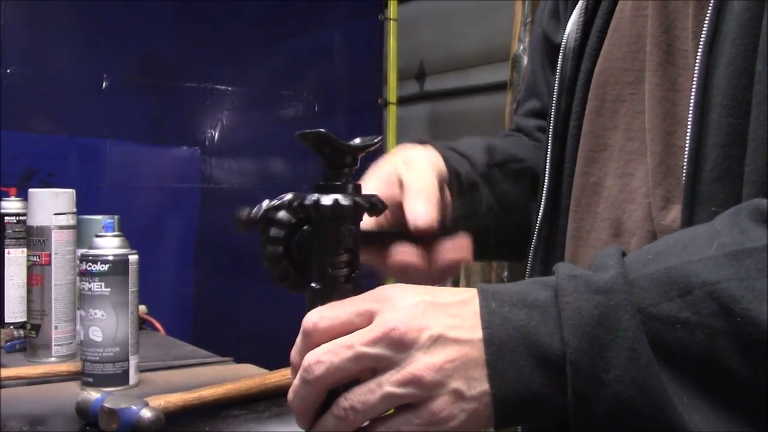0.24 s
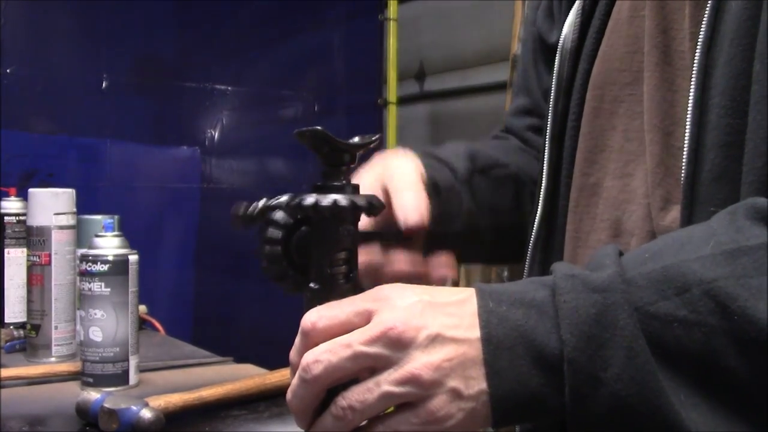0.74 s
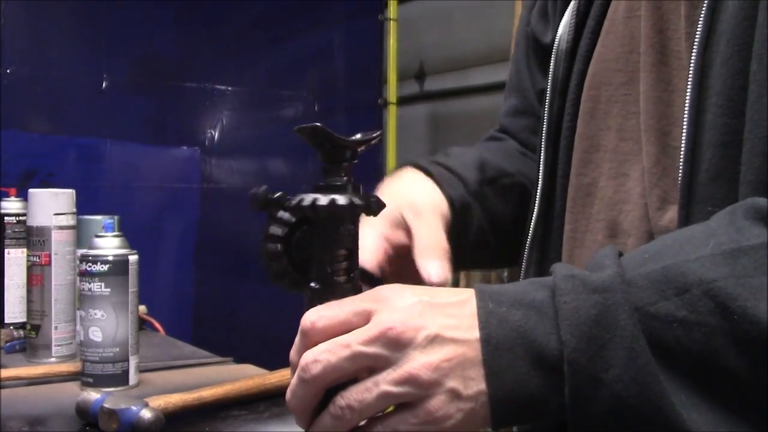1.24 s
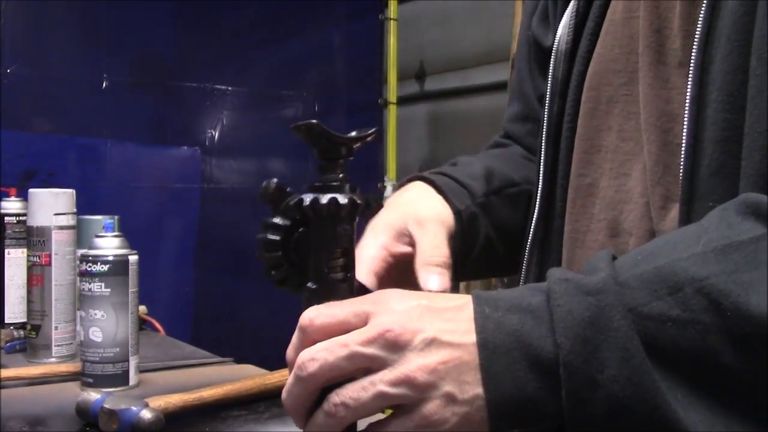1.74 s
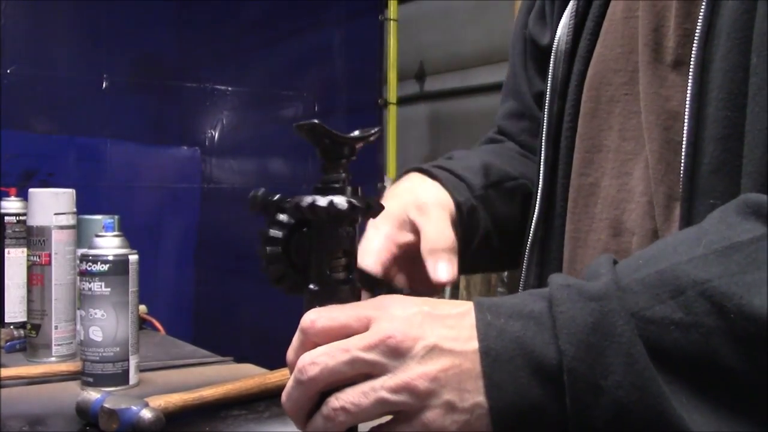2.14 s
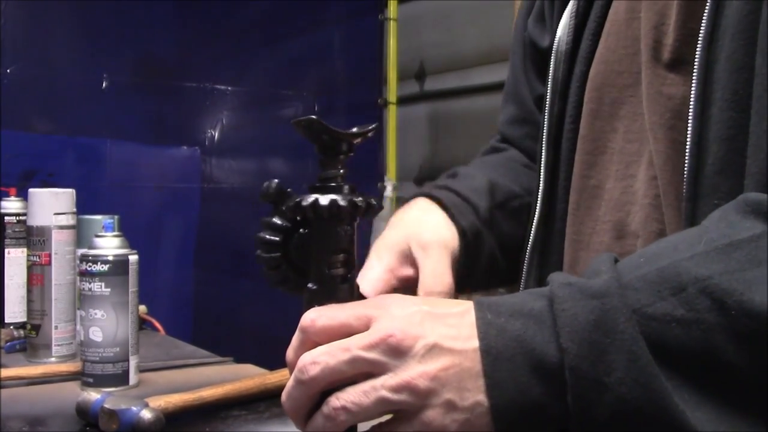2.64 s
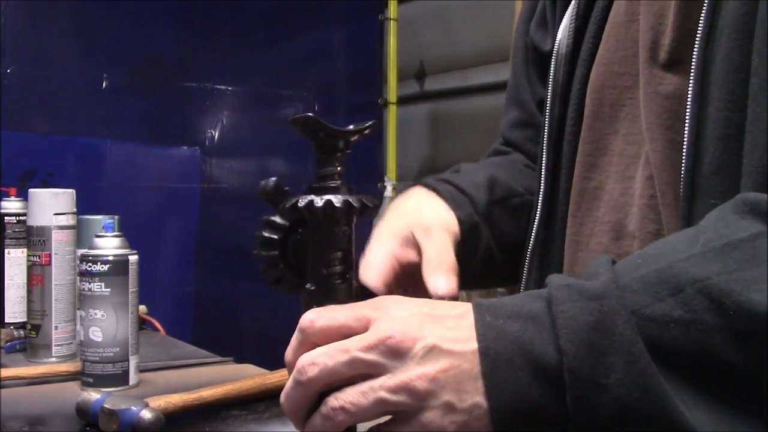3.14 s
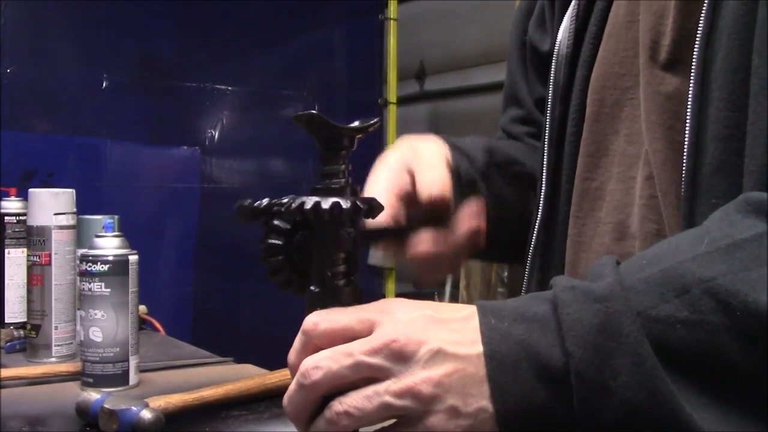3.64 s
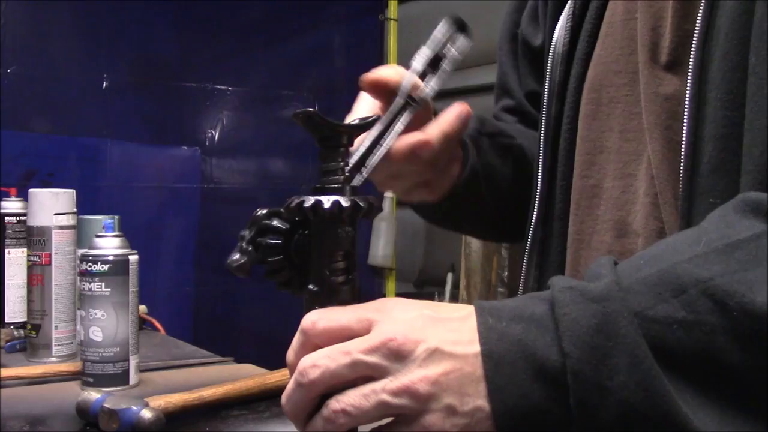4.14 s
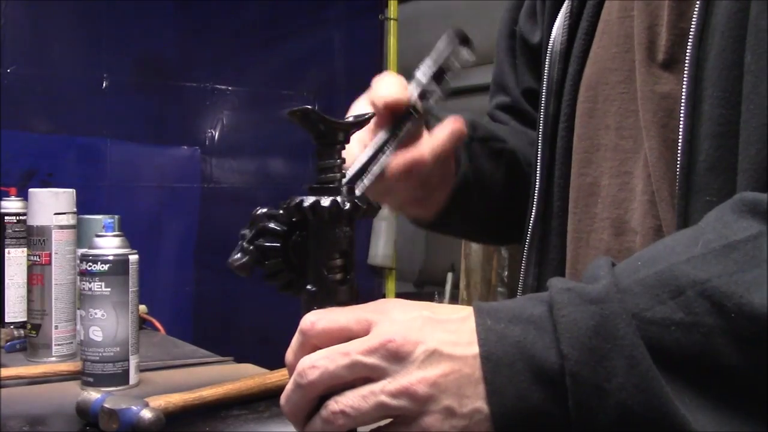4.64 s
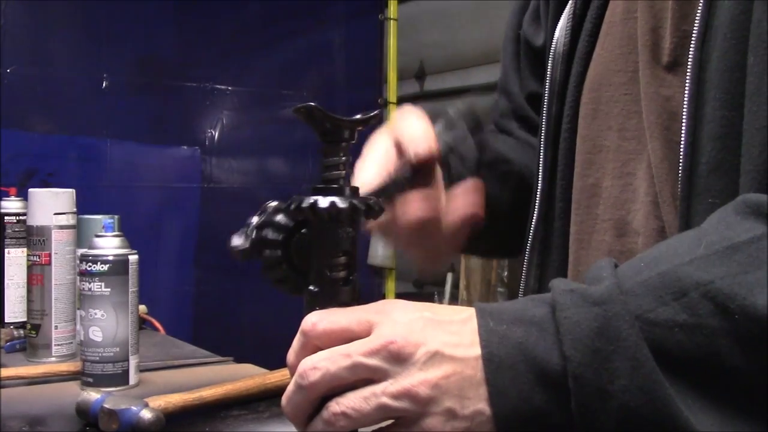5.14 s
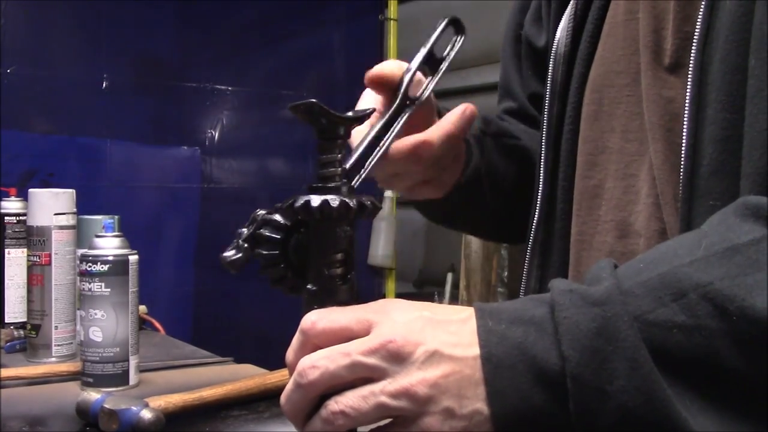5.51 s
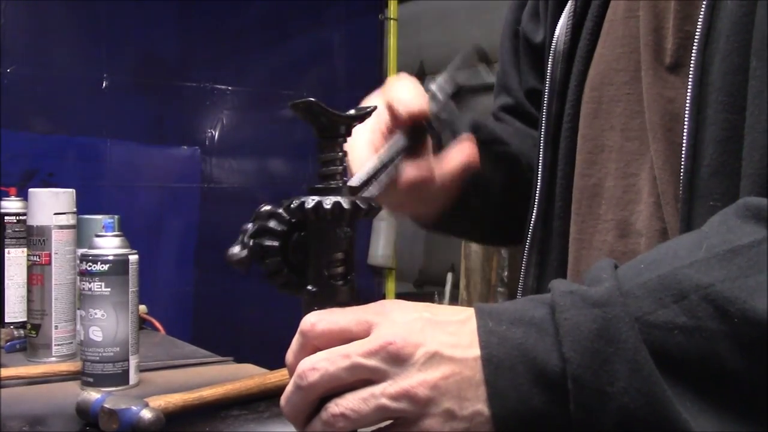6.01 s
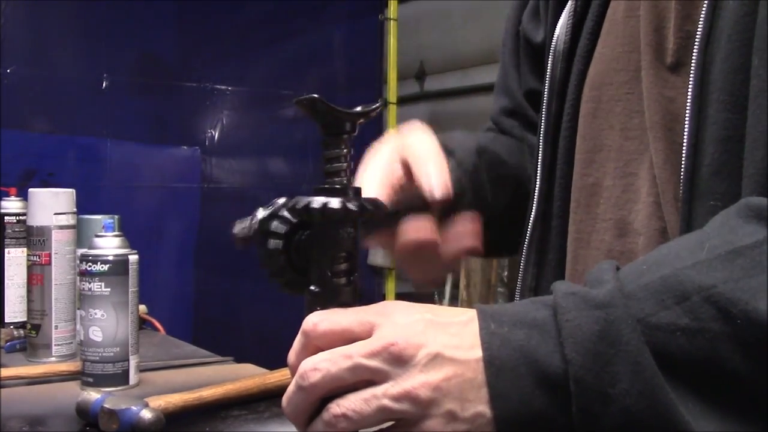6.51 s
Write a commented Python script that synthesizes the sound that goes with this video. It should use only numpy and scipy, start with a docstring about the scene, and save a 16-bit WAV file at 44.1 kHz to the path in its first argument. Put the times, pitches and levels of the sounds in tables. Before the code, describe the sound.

A small steel ratchet jack is cranked by hand, with uneven bright ringing clicks, dull knocks and faint gear grinding.

```python
"""Bright, ringing clicks in an uneven run: a hand swings the handle of a small steel ratchet jack on a
workbench, close to a nearly mono microphone. The pawl snaps over the gear teeth and rings at two high
pitches until the next tooth stops it. Loose gears and the handle knock dully and grind between the
snaps. Behind the jack, the workshop adds a short tail over a low hum."""
import sys
import numpy as np
from scipy import signal
from scipy.fft import rfft, irfft, next_fast_len
from scipy.io import wavfile
from scipy.ndimage import uniform_filter1d

SR = 44100
rng = np.random.default_rng(int(sys.argv[2]) if len(sys.argv) > 2 else 0)


def to_wav(s):
    """Save 16-bit WAV."""
    ch = np.atleast_2d(s).T  # columns
    pcm = np.round(np.clip(ch, -1, 1) * 32767)  # PCM
    wavfile.write(sys.argv[1], SR, pcm.astype(np.int16))


N = 298557
T = np.arange(N) / SR

# the pawl snaps into a tooth or catches on it:
# t/s, crack level/dB, frame level/dB, ring level/dB, ring f/Hz, ring t60/s, overtone level/dB
PAWL_SNAPS = [(0.0406, -10, -12, -6, 5700.0, 0.13, -18), (0.0878, -9.5, -11.5, -7.5, 5680.0, 0.12, -29),
              (0.155, -21.0, -19, -14.5, 5650.0, 0.088, -39),
              (0.5891, -7.0, -8.5, -0.5, 5660.0, 0.063, -20), (0.6365, -8.5, -16, -3, 5680.0, 0.062, -18),
              (0.647, -16, -21, -16, 5680.0, 0.045, -18), (0.9785, -12.5, -14.5, -12.5, 5680.0, 0.11, -29),
              (1.057, -12, -5, -10, 5650.0, 0.063, -31), (1.1029, -5, -7.5, -20, 5700.0, 0.041, -29),
              (1.1551, -12, -12, -12, 5700.0, 0.038, -23.5), (1.4296, -19, -18, -15, 5710.0, 0.024, -46),
              (1.501, -4.5, -10, -8.5, 5690.0, 0.083, -19), (1.5503, -21, -19, -26.5, 5670.0, 0.23, -38),
              (1.5779, -6, -16, -7, 5660.0, 0.022, -22), (1.6017, -20, -21, -34.5, 5680.0, 0.1, -36.0),
              (1.6619, -21, -18, -19, 5680.0, 0.026, -57), (1.868, -23.0, -17.5, -18.5, 5670.0, 0.055, -59),
              (1.942, -31.5, -42, -24.5, 5720.0, 0.09, -49.0), (1.9622, -6.5, -5.5, -8, 5680.0, 0.042, -38),
              (2.0266, -16, -17.5, -11.5, 5680.0, 0.045, -28), (2.0485, -15, -18, -30, 5680.0, 0.14, -48),
              (2.1263, -19, -16.0, -18, 5680.0, 0.031, -45), (2.3, -55, -29, -30.0, 5660.0, 0.079, -66.0),
              (2.3893, -31, -14.5, -9.5, 5660.0, 0.07, -44),
              (2.4191, -9, -10.5, -19.5, 5690.0, 0.14, -27.5),
              (2.4738, -5.5, -15, -4.5, 5650.0, 0.085, -23),
              (2.8857, -9, -12.5, -5.5, 5640.0, 0.157, -19.5), (2.9311, -14, -17.5, -13, 5690.0, 0.15, -26),
              (2.9608, -14.0, -16.5, -26, 5680.0, 0.1, -34),
              (2.9748, -11, -14.5, -11.5, 5700.0, 0.074, -27),
              (3.2388, -46, -31, -22.0, 5700.0, 0.083, -66), (3.3318, -10, -8.5, -3.5, 5690.0, 0.11, -27.5),
              (3.3811, -8.5, -5.5, -14, 5660.0, 0.08, -20.5), (3.407, -16, -18, -27, 5680.0, 0.1, -38),
              (3.5035, -8, -8, -9.5, 5680.0, 0.024, -43.5), (3.7088, -33, -13, -6.5, 5710.0, 0.037, -43),
              (3.7376, -7, -9.5, -4.5, 5700.0, 0.078, -19), (3.7902, -15.5, -13, -15.0, 5680.0, 0.067, -33),
              (3.8384, -7.5, -11.5, -7.5, 5660.0, 0.064, -24),
              (4.091, -23.5, -17, -22.5, 5660.0, 0.084, -48), (4.1826, -4, -5, -11.5, 5690.0, 0.11, -15),
              (4.2423, -4, -9, -7.5, 5670.0, 0.064, -15), (4.26, -18, -13.5, -17.5, 5680.0, 0.058, -36.5),
              (4.3128, -23.5, -18.5, -23, 5680.0, 0.045, -47),
              (4.4983, -22, -20.5, -19.5, 5680.0, 0.035, -43.0), (4.6, -28, -18.0, -19.5, 5696, 0.11, -49),
              (4.6253, -4, -9, -4.5, 5680.0, 0.076, -20), (4.6782, -9.5, -9.5, -3.5, 5700.0, 0.061, -22),
              (5.0486, -15.5, -9.0, -5, 5700.0, 0.084, -31), (5.0888, -6, -7, -10.5, 5680.0, 0.18, -14.5),
              (5.1387, -13, -16, -18, 5670.0, 0.083, -33.0), (5.145, -14.5, -13.5, -15, 5680.0, 0.057, -35),
              (5.231, -23, -13, -14, 5470.0, 0.11, -43), (5.5067, -4.5, -10.5, -9, 5690.0, 0.11, -22),
              (5.555, -7.5, -12, -4, 5650.0, 0.11, -19.5), (5.5849, -16.5, -20, -33, 5680.0, 0.1, -41.5),
              (5.694, -12, -12.5, -8, 5650.0, 0.025, -35), (5.9398, -19, -6, -8.0, 5650.0, 0.06, -35),
              (5.984, -4.5, -7, -6, 5650.0, 0.098, -26), (6.02, -13.0, -18, -42, 5680.0, 0.1, -42.0),
              (6.0362, -16, -6.5, -11, 5680.0, 0.06, -26.5),
              (6.2986, -33, -16.5, -22.5, 5710.0, 0.058, -56.5),
              (6.3897, -9, -9.5, -1.5, 5700.0, 0.056, -24), (6.4416, -17, -18, -19.5, 5680.0, 0.11, -30),
              (6.47, -5, -11.5, -8.5, 5700.0, 0.09, -21.5), (6.567, -17, -13.5, -11, 5720.0, 0.031, -31),
              (6.5913, -11, -11.5, -19, 5680.0, 0.041, -47.5),
              (6.7366, -46, -19, -17.5, 5690.0, 0.042, -60.0), (6.7493, -19.0, -15, -18, 5670.0, 0.16, -44)]
# the handle meets its stop or rattles in its socket: t/s, clack level/dB, frame level/dB, ring level/dB
HANDLE_STOPS = [(0.2565, -33, -22, -38), (0.275, -24, -23, -31.5), (0.7941, -6.5, -10.5, -20),
                (0.957, -30, -19, -36.5), (1.214, -40, -21, -25), (1.265, -7, -12.5, -31),
                (2.141, -22.5, -16, -29), (2.576, -41, -19, -22), (2.598, -23.0, -13, -30.0),
                (3.077, -9, -14.5, -31), (3.902, -31, -18.0, -25), (3.9395, -6, -12, -22),
                (4.38, -41, -19.5, -33), (4.516, -38, -12.5, -31), (4.7794, -24, -14.5, -32.5),
                (5.225, -38, -15, -32), (5.241, -5.5, -8.5, -26), (5.7292, -12.5, -12, -28),
                (6.122, -10.5, -13.5, -27)]
# a loose part lands: t/s, level/dB
PART_DROPS = [(0.328, -19), (0.3526, -33), (0.396, -41.5), (0.4074, -13.5), (0.4427, -25), (0.861, -13.5),
              (0.9267, -34.0), (1.2531, -43), (1.3355, -13.5), (1.6889, -32), (1.72, -28), (1.7815, -28),
              (1.794, -16), (2.222, -39.5), (2.2392, -12), (2.6898, -14.5), (3.1678, -15), (3.5914, -38.5),
              (3.602, -14.5), (4.0292, -14.5), (4.4328, -31), (4.4434, -13), (4.8841, -13.5),
              (5.3178, -35.5), (5.3346, -13), (5.377, -31.0), (5.7834, -12.5), (6.2164, -27),
              (6.2314, -12.5), (6.3697, -23), (6.6755, -11.5)]
# it bounces after each landing: delay/s, relative level/dB
PART_BOUNCES = [(.011, -6), (.021, -14)]
# dull knocks of gears and handle: t/s, level/dB, favoured f/Hz
GEAR_KNOCKS = [(0.041, -17.0, 790.0), (0.087, -16.5, 980.0), (0.154, -18.5, 1250.0), (0.256, -19, 760.0),
               (0.272, -17, 1540), (0.305, -19, 1640), (0.331, -27, 1000.0), (0.406, -18, 780.0),
               (0.505, -16.5, 990.0), (0.591, -18.5, 790.0), (0.638, -18.5, 1030.0), (0.646, -18, 780.0),
               (0.777, -14, 790.0), (0.793, -12, 1080), (0.859, -16.5, 790.0), (0.956, -12.5, 1240),
               (0.978, -16.5, 780), (1.057, -13.5, 790.0), (1.105, -10.0, 780), (1.154, -11.5, 1140),
               (1.215, -23, 800.0), (1.229, -20.5, 810.0), (1.254, -20, 1180.0), (1.267, -14.5, 1140),
               (1.336, -17, 760), (1.43, -18, 970), (1.5, -15.5, 790), (1.548, -21, 1230.0),
               (1.578, -18, 1830.0), (1.602, -21.0, 790.0), (1.661, -18.0, 940), (1.687, -17, 1130.0),
               (1.793, -19.5, 810.0), (1.823, -21.5, 775), (1.868, -15, 970), (1.907, -21.5, 1080),
               (1.962, -14.5, 1320), (2.026, -14.5, 1220), (2.049, -23, 810.0), (2.127, -17.5, 1250),
               (2.14, -12.5, 1270), (2.239, -17.5, 850), (2.302, -23, 1080.0), (2.388, -19.5, 1080),
               (2.419, -17.5, 1110), (2.475, -17.5, 1270), (2.576, -19, 1920), (2.59, -8, 1400),
               (2.672, -19, 1320), (2.691, -11, 1370), (2.785, -31, 1150), (2.815, -18, 1240),
               (2.886, -21.5, 820), (2.932, -21, 1080.0), (2.961, -24.5, 804), (2.976, -16, 1080),
               (3.039, -18, 1330), (3.069, -12.5, 1300.0), (3.077, -10, 1080.0), (3.097, -23, 1270),
               (3.158, -21.5, 1470.0), (3.168, -22, 800), (3.224, -21.5, 1140), (3.26, -16, 1066),
               (3.331, -14, 820), (3.381, -13.5, 820.0), (3.405, -21.0, 800.0), (3.492, -10, 1380),
               (3.503, -6.5, 1140), (3.525, -25, 1260), (3.6, -23, 810.0), (3.649, -14, 1210),
               (3.708, -16, 1248), (3.738, -17.5, 1404), (3.791, -17, 980.0), (3.836, -12.0, 1340.0),
               (3.913, -16, 950), (3.925, -23, 1000.0), (3.94, -11, 1930.0), (3.977, -16.5, 1220),
               (4.017, -22.0, 1070), (4.028, -20.5, 820.0), (4.054, -21, 1080.0), (4.089, -20, 1062),
               (4.111, -13.0, 1030), (4.182, -13.5, 1400), (4.243, -8.5, 1090), (4.26, -27, 820.0),
               (4.314, -18, 1107), (4.326, -20, 1270), (4.341, -16.5, 1360.0), (4.385, -18, 1160),
               (4.423, -18, 1394), (4.443, -18.5, 1540), (4.517, -10.5, 1260), (4.6, -22, 1330),
               (4.625, -13.5, 813), (4.678, -12, 1210), (4.749, -16, 1250), (4.756, -26, 830),
               (4.767, -26, 1350.0), (4.779, -14.5, 1290.0), (4.884, -19.5, 1530.0), (4.94, -18.5, 1080),
               (4.974, -13, 1280), (4.997, -20, 1120), (5.049, -19.5, 1610), (5.088, -16, 1246),
               (5.138, -18.5, 910), (5.144, -16.5, 1000), (5.23, -3.5, 1460), (5.241, -19, 1100),
               (5.334, -20, 820.0), (5.505, -7, 1920.0), (5.555, -20, 1810), (5.584, -22, 810.0),
               (5.698, -15, 1100), (5.725, -8, 1930), (5.784, -20, 820), (5.839, -20.5, 1210.0),
               (5.94, -10.0, 1370), (5.983, -14, 1870.0), (6.02, -24, 800.0), (6.035, -10, 960.0),
               (6.079, -16, 790.0), (6.103, -15.5, 780), (6.124, -16.5, 1270.0), (6.223, -18.5, 804),
               (6.232, -19.5, 1540.0), (6.242, -17.5, 754), (6.298, -20.5, 1080.0), (6.311, -23.5, 960),
               (6.387, -14.5, 1677), (6.44, -18.5, 1410.0), (6.468, -8.0, 1570.0), (6.567, -18, 883),
               (6.577, -17.5, 1306), (6.593, -11.5, 1250), (6.668, -10.5, 797), (6.705, -19, 786),
               (6.735, -26, 1070), (6.749, -17, 1120)]
# gears grinding under load: t/s, level/dB
GRIND_LEVELS = [(0.0, -52), (0.09, -43.5), (0.49, -39.5), (0.62, -46), (1.11, -37.5), (1.58, -42),
                (1.73, -38.5), (2.6, -41.5), (4.18, -39), (4.88, -39.5), (5.13, -36.5), (5.58, -39.5),
                (5.81, -36), (5.92, -36), (6.37, -39.5), (6.77, -33)]
# modes of each struck part: f/Hz, level/dB, t60/s
TOOTH_MODES = [(5370, 0, .008), (6200, 0, .005), (7070, -2, .007), (7900, -3, .006), (8635, -6, .012),
               (9300, -6, .005), (10000, -8, .006), (11100, -11, .005), (12300, -13, .005),
               (13400, -17, .005)]
HANDLE_MODES = [(5440, 0, .014), (6290, 0, .028), (7450, -10, .008), (7830, -10, .012), (8640, -5, .013),
                (9890, -6, .012), (11050, -15, .012), (13150, -16, .015)]
FRAME_MODES = [(1745, -17.5, 0.15), (2518, 7, 0.025), (2720, 16, 0.01), (3238, 11.5, 0.016),
               (3518, 20, 0.0083), (3830, 6.5, 0.015), (5100, -100, 0.005)]
BODY_MODES = [(840, 6.5, 0.016), (1006, 3, 0.019), (1138, 12.5, 0.008), (1281, 8, 0.022),
              (1400, 11.5, 0.018), (1570, 5.5, 0.028), (1872, 7, 0.025), (2680, -18, 0.0134)]
BENCH_MODES = [(134, -1, 0.018), (142, 11, 0.021), (294, -14, 0.34), (470, 5.5, 0.063), (548, 13.5, 0.092)]
# spectra of the grinding and of the workshop's hum and hiss: f/Hz, level/dB
GRIND_SPECTRUM = [(40, -62), (200, -8), (500, 2.5), (720, -2.5), (820, 13), (920, -6.5), (1100, 9.5),
                  (1350, -2.5), (1780, -6), (2400, 1), (2900, -6), (3350, -5), (4200, -11), (9000, -20.5),
                  (15000, -78)]
SHOP_SPECTRUM = [(25, -18), (55, -7), (72, -33), (92, -39), (112, 8.5), (142, 5.5), (170, 1), (240, -6),
                 (288, 9), (320, -9), (500, 3), (545, -2), (600, -9), (830, 6), (1300, -0.5), (2500, -49),
                 (6000, -22), (15000, -17.5)]
# left-right difference at the microphone: f/Hz, level/dB against the common sound
SIDE_SPECTRUM = [(30, -15.5), (70, -21.5), (130, -17), (250, -12), (500, -19.5), (1000, -39), (2000, -18),
                 (5000, -21.5), (8000, -17.5), (13000, -25)]

RING_HZ, STOP_T60_S, DROP_T60_S, DROP_RING_DB = 5685, .04, .09, -52  # the pawl when only shaken
OVERTONE_HZ, OVERTONE_T60_S = 11974, .12


def pawl_ring():
    """The steel pawl rings at two pitches: snaps excite both, stops and drops choke the lower one."""
    contacts = [(s, db, hz, t60) for s, _, _, db, hz, t60, _ in PAWL_SNAPS]
    contacts += [(s, db, RING_HZ, STOP_T60_S) for s, _, _, db in HANDLE_STOPS]
    contacts += [(s, DROP_RING_DB, RING_HZ, DROP_T60_S) for s, _ in PART_DROPS]
    ring = pawl_mode(*np.transpose(sorted(contacts)), split_hz=50, twin_gain=.55, rise_s=.0011)
    times, *_, ring_hz, _, overtone_db = np.transpose(PAWL_SNAPS)
    hz = OVERTONE_HZ + .85 * (ring_hz - RING_HZ)  # the overtone shifts with the ring
    t60 = np.full(len(times), OVERTONE_T60_S)
    return ring + pawl_mode(times, overtone_db, hz, t60, split_hz=40, twin_gain=.6, rise_s=.0017)


def pawl_mode(times, db, hz, t60, split_hz, twin_gain, rise_s):
    """Every contact stops the old ring and starts a new one; a close twin mode beats against it."""
    last = np.maximum(np.searchsorted(times, T) - 1, 0)
    age = T - times[last]
    envelope = np.where(age > 0, undb(db[last] - 60 * age / np.clip(t60[last], .01, 1)), 0)
    envelope = signal.lfilter([1], [1, -np.exp(-1 / (rise_s * SR))], envelope) / (rise_s * SR)
    phase = 2 * np.pi * np.cumsum(hz[last]) / SR
    spread, offset = rng.standard_normal((len(times), 2))[last].T
    beat = 2 * np.pi * split_hz * (1 + .43 * spread) * age + 3.07 * offset
    return envelope * (np.sin(phase) + twin_gain * np.sin(phase + beat))


def tooth_cracks():
    """The pawl strikes a gear tooth with a bright crack."""
    times, db, *_ = np.transpose(PAWL_SNAPS)
    return blows(times, db, TOOTH_MODES, scatter_db=4, rattle_s=.0022, rise_s=.00013, noise=.41)


def handle_clacks():
    """The handle hits its stop or socket and rings briefly."""
    times, db, *_ = np.transpose(HANDLE_STOPS)
    return blows(times, db, HANDLE_MODES, scatter_db=3, rattle_s=.0014, rise_s=.0006, noise=.8)


def loose_parts():
    """A loose part lands with a very short click and bounces twice, more softly."""
    times, db = np.transpose(PART_DROPS)
    clicks = blows(times, db, TOOTH_MODES, scatter_db=4, rattle_s=.00094, rise_s=.000098, noise=1.5)
    for delay_s, bounce_db in PART_BOUNCES:
        timing, force = rng.standard_normal((len(times), 2)).T
        clicks += blows(times + delay_s * (1 + .08 * timing), db + bounce_db + 3 * force, TOOTH_MODES,
                        scatter_db=4, rattle_s=.00055, rise_s=.00012, noise=4)
    return clicks


def frame_clanks():
    """Every snap, drop and stop also rings the frame's lower modes."""
    snaps, drops, stops = np.transpose(PAWL_SNAPS), np.transpose(PART_DROPS), np.transpose(HANDLE_STOPS)
    times = np.r_[snaps[0], drops[0], stops[0]]
    db = np.r_[snaps[2], drops[1] - 6, stops[2]]
    return blows(times, db, FRAME_MODES, scatter_db=.5, rattle_s=.0016, rise_s=.00057, noise=.58)


def gear_knocks():
    """Where a knock lands favours the body modes near its pitch; the bench top thuds along softly."""
    times, db, hz = np.transpose(GEAR_KNOCKS)
    octaves_off = abs(np.log2(np.array(BODY_MODES)[:, 0] / hz[:, None]))
    body = blows(times, db, BODY_MODES, scatter_db=3, rattle_s=.0022, rise_s=.0012, noise=.35,
                 shape_db=-16 * octaves_off)
    bench = blows(times, .92 * db - 21.5, BENCH_MODES, scatter_db=4, rattle_s=.003, rise_s=.0015, noise=.6)
    return body + bench


def blows(times, peak_db, modes, scatter_db, rattle_s, rise_s, noise, shape_db=0):
    """Each blow is a short gritty rattle that rings the modes unevenly, plus raw contact noise."""
    hz, db, t60 = np.transpose(modes)
    t = np.arange(3072) / SR
    out = np.zeros(N + len(t))
    band = signal.butter(3, [min(hz) / 1.15, max(hz) * 1.15], "band", fs=SR, output="sos")
    decays = undb(-60 * np.outer(1 / t60, t))
    # first contact, then the parts chatter on more softly
    contact = (np.exp(-t / rattle_s) + .18 * np.exp(-t / (5 * rattle_s))) * (1 - np.exp(-t / rise_s))
    for s, peak, shape in zip(times, peak_db, np.broadcast_to(shape_db, (len(times), len(hz)))):
        strength, detune = rng.standard_normal((2, len(hz)))
        hiss, grit = rng.standard_normal((2, len(t)))
        partials = np.sin(2 * np.pi * np.outer(hz * (1 + .006 * detune), t)) * decays
        ring = undb(db + shape + scatter_db * strength) @ partials
        rattle = hiss * undb(.88 * grit) * contact
        hit = signal.fftconvolve(ring, rattle)[:len(t)]
        crack = signal.sosfilt(band, rattle)
        hit = signal.sosfilt(band, hit / abs(hit).max()) + noise * crack / abs(crack).max()
        start = int(s * SR)
        out[start:start + len(t)] += undb(peak) * hit / abs(hit).max()
    return out[:N]


def gear_grind():
    """Tiny uneven slips between the gear flanks, with stray thin ticks; the pawl sings faintly along."""
    slips = rng.standard_normal(N) * undb(5 * walk(150) + 2.2 * walk(27))
    touches = rng.standard_normal(N) * (rng.random(N) < 22 / SR)  # about 22 a second
    ticks = rng.standard_normal(N) * signal.lfilter([1], [1, -.985], touches)
    ticks = colour(ticks, [(500, -40), (3000, -10), (6500, -2), (9000, 0), (15000, -4)])
    singing = signal.lfilter(*signal.iirpeak(5690, Q=90, fs=SR), slips)
    grind = level(colour(slips, GRIND_SPECTRUM), 0) + level(ticks, -17.5) + level(singing, -12)
    return grind * undb(np.interp(T, *np.transpose(GRIND_LEVELS)))


def workshop_tail(direct):
    """The room answers, quieter and a little duller than the close jack."""
    return undb(-21) * signal.lfilter([1], [1, -.45], reflections(direct, t60_s=.44, rise_s=.0049))


def reflections(x, t60_s, rise_s):
    """A dense decaying spray of echoes, of unit energy, smears the sound."""
    t = np.arange(SR // 2) / SR
    spray = rng.standard_normal(len(t)) * undb(-60 * t / t60_s) * np.clip(t / rise_s, 0, 1)
    return signal.fftconvolve(x, spray / np.sqrt(np.sum(spray ** 2)))[:N]


def workshop_hum():
    """Room tone: low hum and hiss, wavering a little."""
    return level(colour(rng.standard_normal(N), SHOP_SPECTRUM) * undb(.5 * walk(4)), -51)


def undb(db):
    return 10 ** (np.asarray(db) / 20)


def level(x, rms_db):
    return x * undb(rms_db) / np.sqrt(np.mean(x ** 2))


def colour(x, points):
    """Filter by a spectrum of points: f/Hz, level/dB."""
    hz, db = np.transpose(points)
    size = next_fast_len(N)
    bin_hz = np.arange(size // 2 + 1) * SR / size
    gain = undb(np.interp(np.log(bin_hz + 1), np.log(hz), db))
    return irfft(rfft(x, size) * gain, size)[..., :N]


def walk(rate_hz):
    """Random steps, smoothed twice; spread near 1."""
    hold = int(SR / rate_hz)
    steps = np.repeat(rng.standard_normal(N // hold + 1), hold)
    return 1.31 * uniform_filter1d(uniform_filter1d(steps, hold), hold)[:N]


def scene():
    """The jack close up and central, the workshop behind it."""
    clicks = tooth_cracks() + handle_clacks() + loose_parts() + frame_clanks()
    jack = clicks + pawl_ring() + gear_knocks() + gear_grind()
    mid = jack + workshop_tail(jack) + workshop_hum()
    # nearby reflections reach the two microphone ports slightly differently
    side = colour(reflections(mid, t60_s=.07, rise_s=.001), SIDE_SPECTRUM)
    return np.array([undb(2.53) * mid + side, undb(2.43) * mid - side])


def record(dry):
    """The microphone dulls the treble, the loudest snaps overload, and the very top is cut."""
    dulled = colour(dry, [(12500, -2), (16000, -14)])
    top_cut = signal.ellip(12, .2, 100, 16300, fs=SR, output="sos")
    return signal.sosfilt(top_cut, np.clip(dulled, -.88, .88))


dry = scene()
out = record(dry)
to_wav(out)
```